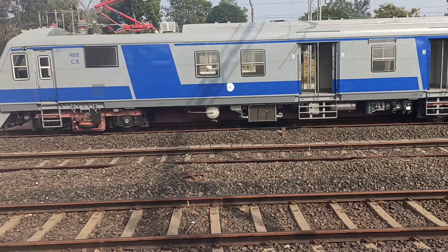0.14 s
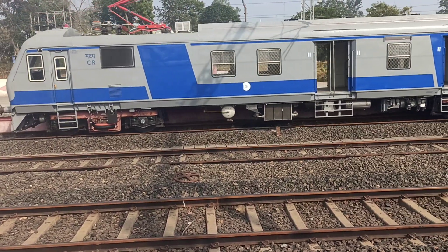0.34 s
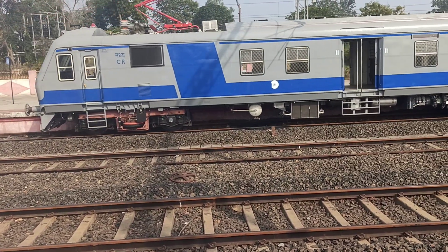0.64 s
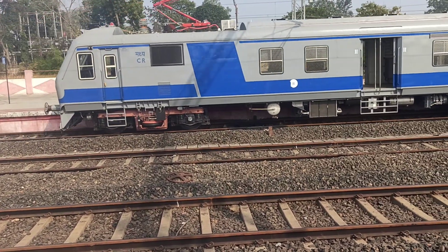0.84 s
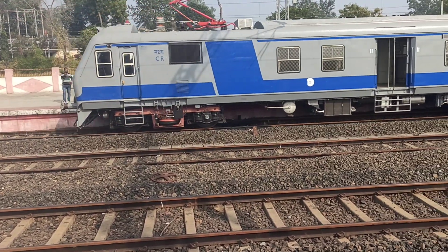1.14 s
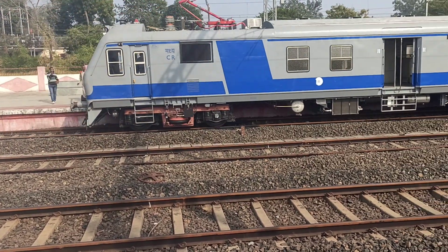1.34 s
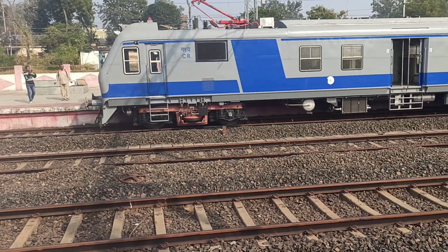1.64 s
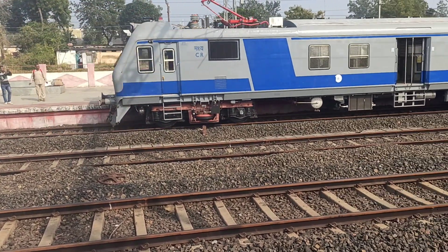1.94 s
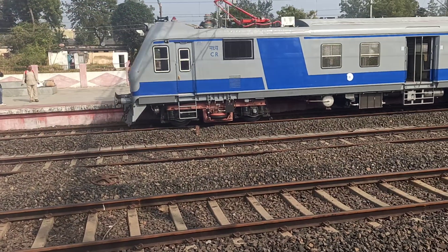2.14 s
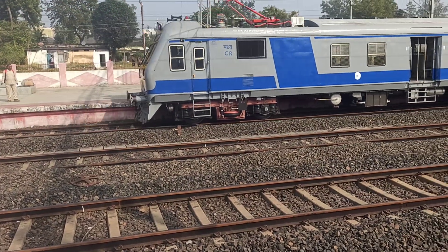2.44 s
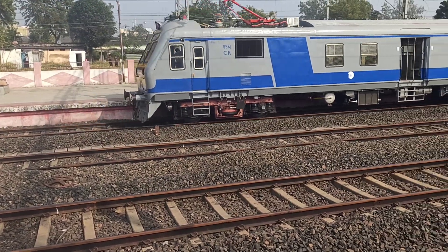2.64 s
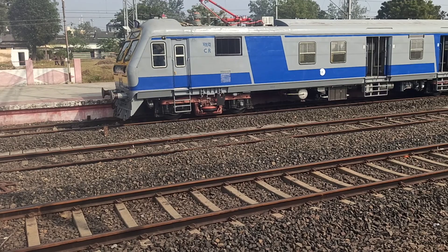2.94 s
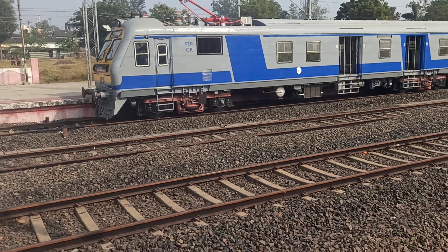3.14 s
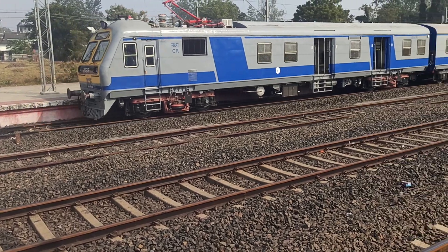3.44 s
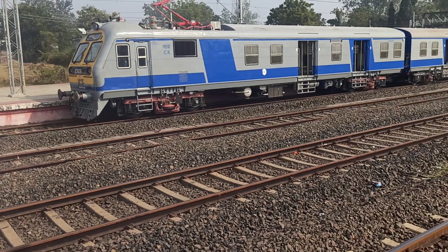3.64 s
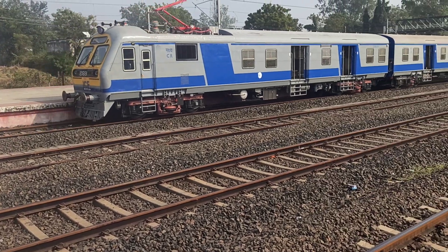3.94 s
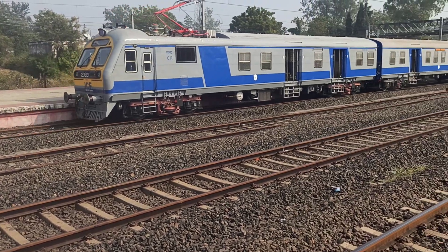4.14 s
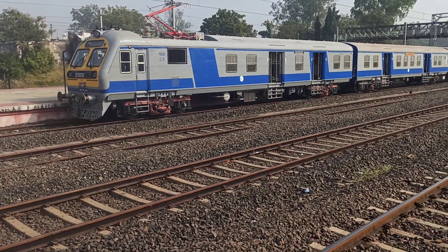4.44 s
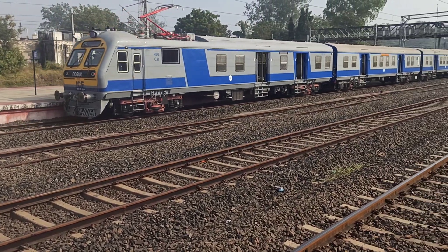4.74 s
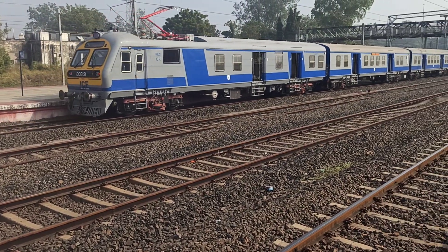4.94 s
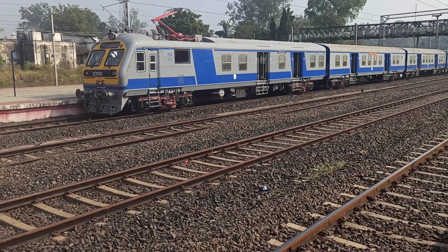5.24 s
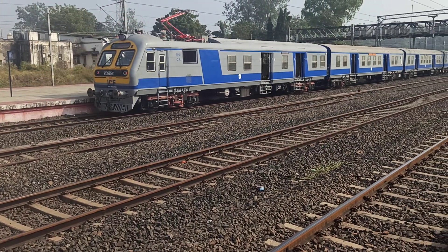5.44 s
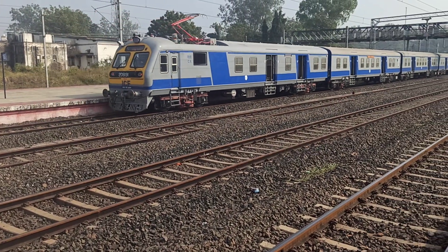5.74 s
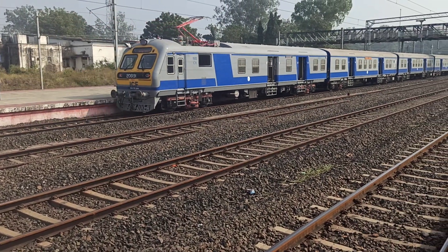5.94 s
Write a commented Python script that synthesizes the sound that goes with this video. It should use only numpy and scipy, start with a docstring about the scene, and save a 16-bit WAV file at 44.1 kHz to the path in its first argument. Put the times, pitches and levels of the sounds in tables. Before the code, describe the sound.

Wheels rumble and thud over rail joints as an electric train whines and hisses past; a brief horn toots, the compressor stops and air bursts out.

```python
"""A station platform, heard across the tracks by a phone with two ports, as an electric train draws away.
Cooling fans and a blower hiss in shaped noise, and a converter whines in two beating tones.
Wheels rumble in noise and thud over rail joints through bogie resonances; a compressor clatters in
harmonics of its shaft until it cuts out with a long blast of air, a jet of noise.
A horn off to one side toots once in swept harmonics, and its echoes are delayed, sharper repeats."""
import sys
import numpy as np
from scipy import signal
from scipy.fft import rfft, irfft, next_fast_len
from scipy.io import wavfile
from scipy.ndimage import uniform_filter1d, map_coordinates

SR = 44100
rng = np.random.default_rng(int(sys.argv[2]) if len(sys.argv) > 2 else 0)


def wav_record(signal):
    """Record a signal, one row per channel, as 16-bit PCM in the file named by sys.argv[1]."""
    frames = np.transpose(np.atleast_2d(signal))
    bounded = np.clip(frames, -1, 1)
    # unit amplitude maps onto the largest positive 16-bit level
    quanta = np.round(bounded * 32767).astype(np.int16)
    wavfile.write(sys.argv[1], SR, quanta)


def to_linear_factor(level_db):
    """Convert decibel levels (scalar or array-like) to linear amplitude factors."""
    exponent = np.asarray(level_db, float) / 20
    return 10 ** exponent


N = 268128
T = np.arange(N) / SR
SIZE = next_fast_len(N)
HZ = np.arange(SIZE // 2 + 1) * SR / SIZE + 1e-3  # just above zero, for the log axis
PORT_SIGN = np.array([[-1], [1]])  # left, right


def curves(table):
    """Columns of a table as sample-rate lines."""
    s, *columns = np.transpose(table)
    return [np.interp(T, s, c) for c in columns]


def across(table, hz):
    """Columns of a table read on a log-frequency axis."""
    f, *columns = np.transpose(table)
    return [np.interp(np.log(hz), np.log(f), c) for c in columns]


def unit(x):
    """Scale to rms 1."""
    return x / np.sqrt(np.mean(x ** 2))


def walk(rate):
    """Random levels held 1 / rate s and slewed twice; spread near 1."""
    hold = int(SR / rate)
    steps = np.repeat(rng.standard_normal(N // hold + 1), hold)
    return 1.318 * uniform_filter1d(uniform_filter1d(steps, hold), hold)[:N]


def ports(shared, own, table):
    """Two spectra: a shared part turned in phase, an unrelated part, and a tilt in level."""
    like, turn, pan_db = across(table, HZ)
    like = np.clip(like, 0, 1)
    common = np.sqrt(like) * shared * np.exp(.5j * PORT_SIGN * turn)
    return (common + np.sqrt(1 - like) * own) * to_linear_factor(-PORT_SIGN * pan_db / 2)


def hiss(colour, table, edges, swell, flicker_db, flicker_hz, rings=()):
    """Coloured noise in bands that swell together (dB in time) and flicker alone."""
    white = rfft(rng.standard_normal((3, SIZE)))
    db = across(colour, HZ)[0]
    for hz, width, lift_db in rings:
        db = db + lift_db / (1 + (2 * (HZ - hz) / width) ** 2)
    both = ports(white[0], white[1:], table) * to_linear_factor(db)
    out = 0
    for lo, hi in zip(edges, edges[1:]):
        band = irfft(both * (HZ >= lo) * (HZ < hi), SIZE)[:, :N]
        out = out + band * to_linear_factor(swell + flicker_db * walk(flicker_hz))
    return out


# Band edges in Hz: where the treble gap starts, where it ends, where the top ends.
TREBLE_GAP_HZ = (8680, 11560, 15780)


def jet(db, top_db, colour, rings, top_colour, table, swell_db, flicker_db):
    """Rushing air: a body reaching through the treble gap and a thin top above it, swelling together."""
    swell = swell_db * walk(16)
    low, high, top_hz = TREBLE_GAP_HZ
    body_edges = (1500, 3300, 4400, 5200, 6100, 7600, low, high)
    body = hiss(colour, table, body_edges, swell, flicker_db, 24.0, rings)
    top = hiss(top_colour, table, (high, 13000, top_hz), swell, flicker_db, 18.0)
    return to_linear_factor(db) * unit(body) + to_linear_factor(top_db) * unit(top)


# What the ports share of blower, fans and compressor.
# Each row: frequency in Hz, likeness 0-1, lead of the right in radians, left minus right in dB.
NEAR_PORTS = [(60, .988, 0, 0), (290, .975, 0, 0), (580, .5, -.6, -2), (730, .95, .12, -.2),
              (860, .9, .25, 1.5), (1150, .45, 2.0, 1.2), (1700, .3, 1.2, 3), (2200, .35, 2.3, -2.4),
              (2860, .8, 3.0, -7.8), (3500, .55, 2.5, -2), (4700, .65, 5.4, -2.3), (5500, .65, 5.7, -4.8),
              (6300, .5, 6.3, -2), (6900, .3, 7.4, -2), (7800, .55, 6.2, 1), (8300, .45, 6.0, 2.5),
              (12000, .35, 7.6, -4), (15000, .3, 6.3, 0)]
# The blower's one singing band. Each row: frequency in Hz, relative level in dB.
BLOWER_COLOUR = [(2600, -22), (2760, -1), (2890, 0), (3010, -2), (3200, -22)]
BLOWER_DB, BLOWER_SINKS_DB_S = -43.5, .1
UNLOAD_S = 3.52  # the compressor loses its load


def blower():
    """A narrow rush of air from the compressor's blower; it barely sinks, then fades as the load drops."""
    running = np.clip(1 - (T - UNLOAD_S) / .45, 0, 1)
    rush = unit(hiss(BLOWER_COLOUR, NEAR_PORTS, (2600, 2850, 3200), .8 * walk(12), 1.5, 30.))
    return running * rush * to_linear_factor(BLOWER_DB - BLOWER_SINKS_DB_S * T)


# Fan loudness. Each row: time in seconds, body level in dB, top level in dB.
FAN_LEVELS = [(0, -32.5, -48), (.45, -29.5, -42), (.8, -32.5, -48.5), (1.9, -32.5, -50.5),
              (2.45, -34.5, -52), (2.82, -34.5, -48.5), (3.2, -37.5, -56.5), (3.6, -37, -49),
              (6.08, -47.5, -55.5)]
# Colour of the fan body. Each row: frequency in Hz, relative level in dB.
FAN_COLOUR = [(1470, -50), (2500, -9.5), (2620, -36), (2760, 1), (2890, -8.5), (3360, -10), (4320, -8),
              (4580, -9), (4970, -16), (5400, -9.5), (5840, -17.5), (6180, -4.5), (6540, -2.5), (7480, -9),
              (8600, -18.5), (9000, -48.5), (11200, -51.5), (18900, -120)]
# Grille resonances. Each row: frequency in Hz, width in Hz, lift above the hiss in dB.
FAN_RINGS = [(4670, 110, 7.5), (5630, 180, 5.5), (6220, 63, 5), (6580, 55, 6), (7250, 120, 7)]
# Colour of the fan top. Each row: frequency in Hz, relative level in dB.
FAN_TOP = [(6820, -39), (11600, -2), (12100, 2), (12800, -6.5), (14800, -5.5), (15800, -21.5)]


def fans():
    """Cooling air through grilles, fading as the motor car draws away."""
    return jet(*curves(FAN_LEVELS), FAN_COLOUR, FAN_RINGS, FAN_TOP, NEAR_PORTS, 0.69, 1.45)


# Whine loudness. Each row: time in seconds, level of the pair in dB.
WHINE_DB = [(0, -37), (.3, -43), (.62, -34.5), (1.0, -40.5), (1.2, -49), (1.65, -39), (1.9, -40.5),
            (2.15, -38), (2.5, -43.5), (2.9, -38.5), (3.4, -37.5), (3.65, -46), (3.87, -38), (4.3, -44),
            (4.5, -35), (4.72, -37.5), (4.9, -55), (5.15, -40), (5.33, -48), (5.6, -35), (5.8, -49),
            (6.0, -39.5), (6.08, -46)]
# Faint converter companions. Each row: frequency in Hz, starting level in dB.
SIDE_TONES = [(1386, -54), (2190, -55.5), (2370, -58)]
# pitch at the start, its sag, and the spacing of the two units that beat together
WHINE_HZ, WHINE_SAG_HZ_S, PAIR_HZ = 1498, 2.3, 7.5


def whine():
    """Two converter tones a little apart that tremble and beat, with an octave and faint companions."""
    db, out = curves(WHINE_DB)[0], 0
    for apart in (-.5, .5):
        hz = WHINE_HZ - WHINE_SAG_HZ_S * T + apart * PAIR_HZ + 5.1 * walk(30)
        phase = 2 * np.pi * np.cumsum(hz) / SR
        port_phase = np.array([0.38 * walk(12), 0.76 * walk(12) - .3])
        out = out + to_linear_factor(db + 2.1 * walk(25.01)) / np.sqrt(2) * np.sin(phase + port_phase)
    # the octave rides on the upper tone
    out = out + to_linear_factor(-55.5 + 6.9 * walk(9)) * np.sin(2 * phase)
    for side_hz, side_db in SIDE_TONES:
        fading_db = side_db - 0.58 * T + 5.25 * walk(11)
        side_phase = 2 * np.pi * np.cumsum(side_hz + 6.62 * walk(30)) / SR
        out = out + to_linear_factor(fading_db) * np.sin(side_phase + np.array([[0], [1.2]]))
    return np.sqrt(2) * out  # sine peaks for rms levels


# What the ports share of wheels, joints and air blast.
# Each row: frequency in Hz, likeness 0-1, lead of the right in radians, left minus right in dB.
FAR_PORTS = [(60, .988, 0, 0), (290, .97, -.1, 0), (580, .67, -.5, 1.5), (730, .88, -.15, .7),
             (860, .9, -.2, 0), (1150, .45, -1.4, 3.6), (1490, .74, -.4, 0), (1720, .37, -1.8, -.6),
             (2200, .52, .1, -1.1), (2860, .8, .1, -1.5), (4300, .62, -.8, -2), (5500, .55, -.8, -4.4),
             (6300, .5, -1.8, -4.2), (6800, .4, -1.5, -2), (7300, .5, .9, 1.6), (7800, .5, .6, 2),
             (8300, .5, 3.6, 1.5), (12000, .3, 6.3, 1.5), (15000, .3, 3.9, -1)]
# Colour of wheel on rail. Each row: frequency in Hz, relative level in dB.
ROLL_COLOUR = [(30, -47), (50, -17.5), (70, -3.5), (117, -1.5), (200, -4), (290, 0), (400, -9.5),
               (490, -18.5), (620, -11), (760, -8), (920, -12.5), (1060, -23.5), (1500, -15), (1830, -26),
               (2600, -23)]
# start levels, both against the rms of the roar's noise, and how fast each sinks as the train draws away
ROAR_DB, ROAR_SINKS_DB_S = -30, 1.26
ROLL_MID_DB, MID_SINKS_DB_S = -30.5, 0.85


def rolling():
    """Wheel on rail: a lumpy low roar and a mid, ringing near the converter pitch, that sinks more slowly."""
    low = hiss(ROLL_COLOUR, FAR_PORTS, (20, 90, 140, 220, 470), 1.1 * walk(14), 2.4, 22.053)
    mid_ring = [(1493, 62, 7.1)]  # Hz, width Hz, lift dB
    mid = hiss(ROLL_COLOUR, FAR_PORTS, (480, 990, 1890, 3130), 0.27 * walk(4.92), 2.2, 10., mid_ring)
    roar = low * to_linear_factor(ROAR_DB - ROAR_SINKS_DB_S * T)
    thin = mid * to_linear_factor(ROLL_MID_DB - MID_SINKS_DB_S * T)
    return (roar + thin) / np.sqrt(np.mean(low ** 2))


# Wheels over rail joints. Each row: time in seconds, rattle drive in dB, decay to -60 dB in seconds
# (anything under 0.05 plays as 0.05).
JOINTS = [(0.187, -27, 0.7), (0.898, -24.5, 0.7), (1.105, -28, 0.5), (1.515, -28, 0.5), (2.466, -20, -0.63),
          (2.579, -31, 0), (2.858, -27, 0.7), (3.038, -35, 0.3), (3.547, -18.5, 0.5), (3.583, -26, 0.1),
          (3.831, -31, 0.5), (3.979, -23, 0.3), (4.235, -23, 0.5), (4.411, -34.5, 0.2),
          (4.655, -28.5, 0.76), (4.688, -33, 0.16), (4.903, -26, 0.35), (5.12, -26, 0.27),
          (5.591, -24, 0.42), (5.719, -37, 0.14)]
# Bogie modes, each used as two resonators in a row. Each row: frequency in Hz, width of one resonator
# in Hz, drive in dB. The last row is the bright rattle, whose drive is evened out.
BOGIE = [(117.5, 44, -2.5), (179, 49, -1.5), (286.6, 71, -1), (692, 390, -3)]
KNOCK_DB = 43  # knock impulse over rattle
# bright part at a -23.5 dB rattle, its growth per dB of rattle, and its rise along the scene
BRIGHT_DB, BRIGHT_SHARE, BRIGHTENS_DB_S = -35, .4, 1.2


def joints():
    """Each wheel drop knocks the bogie and shakes it with a dying rattle; the bright part builds more slowly."""
    shake, knock = np.zeros((2, N)), np.zeros(SIZE)
    for s, db, t60 in JOINTS:
        bright_db = BRIGHT_DB + BRIGHT_SHARE * (db + 23.5) - db + BRIGHTENS_DB_S * s
        age = np.clip(T - s + 0.009, 0, None)  # the rattle starts 9 ms before the knock
        dying = to_linear_factor(db) * np.exp(-np.log(1000) * age / max(t60, .05))
        dull_rise = 1 - np.exp(-age / 0.006)
        bright_rise = to_linear_factor(bright_db) * (1 - np.exp(-age / 0.03))
        shake += dying * np.array([dull_rise, bright_rise])
        knock[int(s * SR)] = to_linear_factor(db + KNOCK_DB)
    white = rfft(rng.standard_normal((3, SIZE)))
    rings = [to_linear_factor(db) / (1 + 1j * (hz / width) * (HZ / hz - hz / HZ)) ** 2 for hz, width, db in BOGIE]
    dull_ring = sum(rings[:-1])
    out = irfft(rfft(knock) * dull_ring, SIZE)[:N]
    for ring, size in zip((dull_ring, rings[-1]), shake):
        rattle = irfft(ports(white[0], white[1:], FAR_PORTS) * ring, SIZE)[:, :N]
        # many loose parts at once: the rattle keeps an even strength
        out = out + size * rattle / np.sqrt(uniform_filter1d(np.mean(rattle ** 2, axis=0), size=1500))
    return out


# Shaft speed. Each row: time in seconds, turns per second.
SHAFT = [(0, 24.49), (2, 24.44), (3.5, 24.36), (3.95, 24.3)]
# Strong low orders of the clatter. Each row: order of the shaft, relative level in dB.
PUMP_LOW = [(22, -22), (23, -22), (24, -25.5), (25, -15.5), (26, -24.5), (27, -20.5), (28, -13),
            (29, -10.5), (30, -5.5), (31, -27), (32, -12.5), (33, -5.5), (34, -26.5), (35, -13.5),
            (36, -11), (37, -12.5), (38, -19), (39, -18.5), (40, -17.5), (41, -19.5), (42, -25),
            (43, -26.5), (44, -18), (45, -47)]
# Casing colour of the higher orders. Each row: frequency in Hz, relative level in dB.
PUMP_CASE = [(1000, -13), (1250, -32), (1490, -23.5), (1700, -25.5), (1950, -42), (2190, -22.5),
             (2500, -55.5), (2800, -13), (2980, -15.5), (3200, -43)]
# Drone on the tenth order of the shaft. Each row: time in seconds, level in dB.
DRONE = [(0, -25.5), (.15, -33.5), (.28, -27.5), (.75, -35), (.9, -33), (1.4, -42), (1.53, -33),
         (1.62, -37), (3.45, -40.5)]
PUMP_DB, PUMP_SINKS_DB_S, PUMP_STOPS_S, RUN_DOWN_S = -29.8, 0.9, 3.9, 0.13
UNLOAD_WAVER = .012  # the shaft speed wavers by this share once the load drops


def compressor():
    """The same clatter comes round every shaft turn, changing a little from moment to moment."""
    turns, db = curves(SHAFT)[0], PUMP_DB - PUMP_SINKS_DB_S * T
    unloaded = np.clip((T - UNLOAD_S) / .1, 0, 1)
    angle = np.cumsum(turns * (1 + UNLOAD_WAVER * walk(9) * unloaded)) / SR
    order = np.arange(1, 135)
    chance = rng.standard_normal((len(order), 2))
    order_db = across(PUMP_CASE, order * turns[0])[0] + 2.75 * chance[:, 0]
    order_db[:int(PUMP_LOW[0][0])] = -60  # next to nothing below the listed orders
    for k, low_db in PUMP_LOW:
        order_db[int(k) - 1] = low_db
    like, turn, pan_db = across(NEAR_PORTS, order * turns[0])
    unlike = np.sqrt(1 - np.clip(like, 0, 1))
    steps = 44  # wave shapes over the first 4 s
    drift = rng.standard_normal((3, steps, len(order), 2)) @ [1, 1j]
    common_drift = np.minimum(0.19 + order / 300, .7) * drift[0]
    out = []
    # the left port takes the larger part of the turn and tilt
    for sign, own in ((-1.38, drift[1]), (0.73, drift[2])):
        lines = to_linear_factor(order_db - sign * pan_db / 2) * np.exp(1j * (9 * chance[:, 1] + sign * turn / 2))
        lines = lines * (1 + common_drift + 0.76 * unlike * own)
        shapes = irfft(np.pad(lines, ((0, 0), (1, 0))), 4096)  # one shaft turn per row
        place = [np.minimum(T / 4, 1) * (steps - 1), angle % 1 * 4095]
        out.append(map_coordinates(shapes, place, order=1))
    clatter = unit(np.array(out)) * to_linear_factor(db + 1.36 * walk(10))
    # it runs down just after the valve opens
    running = np.clip((PUMP_STOPS_S - T) / RUN_DOWN_S, 0, 1)
    drone = np.sqrt(2) * to_linear_factor(curves(DRONE)[0] + 2.5 * walk(8)) * np.sin(2 * np.pi * 10 * angle)
    return running * clatter + drone * np.clip((3.5 - T) / 0.075, 0, 1)


# Colour of the jet's body. Each row: frequency in Hz, relative level in dB.
AIR_COLOUR = [(1120, -42), (1900, -17.5), (2100, -12), (2610, -15), (2860, -4.5), (3170, -12), (3830, -5),
              (4210, -3.5), (4810, -2.5), (5000, -14.5), (5420, -4), (6190, 1), (6810, -5.5), (7390, -5),
              (8600, -3.5), (9000, -29.5), (11200, -36.5), (18900, -120)]
# Pipe resonances. Each row: frequency in Hz, width in Hz, lift above the jet in dB.
AIR_RINGS = [(4220, 97, 7), (4680, 63, 5), (5470, 110, 4.5), (6200, 120, 7.5), (6600, 100, 3),
             (7450, 74, 9)]
# Colour of the jet's top. Each row: frequency in Hz, relative level in dB.
AIR_TOP = [(6820, -47), (11600, -6.5), (13400, -5), (15100, -2), (15800, -19)]
# Surges as the valve opens. Each row: time in seconds, lift above the jet in dB, lift of the top in dB,
# half length in seconds.
SURGES = [(3.675, -0.5, 8.5, .04), (3.77, 4, 9.5, 0.025)]
VALVE_S, VALVE_RISE_S, JET_DB, JET_TOP_DB, JET_SINKS_DB_S = 3.6, 0.043, -28.5, -44, 1.16
SETTLE_DB, SETTLE_S = 2, 0.55  # the jet starts strong and settles


def air_blast():
    """The unloader valve opens and a jet of air hisses away, surging and sharpest at first."""
    age = np.clip(T - VALVE_S, 0, None)
    sinking_db = SETTLE_DB * np.exp(-age / SETTLE_S) - JET_SINKS_DB_S * age
    db, top_db = JET_DB + sinking_db, JET_TOP_DB + sinking_db
    for s, lift_db, top_lift_db, half_s in SURGES:
        surge = np.exp(-((T - s) / half_s) ** 2)
        db, top_db = db + lift_db * surge, top_db + top_lift_db * surge
    opening = np.clip(age / VALVE_RISE_S, 0, 1)
    return opening * jet(db, top_db, AIR_COLOUR, AIR_RINGS, AIR_TOP, FAR_PORTS, 0.32, 1.6)


HORN_S, HORN_HOLD_S, HORN_ATTACK_S, HORN_RELEASE_S, HORN_FADE_DB_S = 1.695, .262, .075, .035, 14
# pitch: starts sharp, sags to its rest, then creeps up
HORN_HZ, HORN_SHARP_HZ, HORN_SAG_S, HORN_CREEP_HZ_S = 283.2, 22, .032, 10
ECHO_STRETCH = .08  # an echo lasts longer by this share of its delay


def toot(delay_s, sharper_hz):
    """Loudness and phase of the reed as heard along one path."""
    age = np.clip(T - HORN_S - delay_s, 0, None)
    attack = np.clip(age / HORN_ATTACK_S, 0, 1)
    release = np.clip(1 - (age - HORN_HOLD_S - ECHO_STRETCH * delay_s) / HORN_RELEASE_S, 0, 1)
    hz = HORN_HZ + sharper_hz + HORN_SHARP_HZ * np.exp(-age / HORN_SAG_S) + HORN_CREEP_HZ_S * age
    return attack * release * to_linear_factor(-HORN_FADE_DB_S * age), 2 * np.pi * np.cumsum(hz) / SR


# Horn partials 1, 2, .. at the ports. Each row: lead of the right in radians, left minus right in dB.
HORN_PARTIALS = [(.5, -1), (2.2, -3.5), (2.0, -.9), (-2.8, 2.5), (-2.4, 0), (-.8, 0), (.6, 0), (1.2, -2),
                 (.5, -2), (2.5, -6), (2.0, 0), (2.0, 0), (2.4, 0), (2.0, 0)]
# Strength of partials 1, 2, .. in dB, before the lift given to the first three.
HORN_DB = [-19, -31.5, -27, -30, -34, -33.5, -44, -41.5, -41, -42, -40, -44, -43, -46]
# Echoes. Each row: delay in seconds, sharper by Hz, level in dB of partials 1, 2, 3 and of the rest,
# phase blur in radians (partial 1 stays unblurred).
HORN_ECHOES = [(.085, 3.4, -20, -1, -2, -11, .07), (.305, 7, -8, -12, -14, -13, .45),
               (.72, 7.5, -19, -24, -26, -28, .45)]
# Moments in seconds when the first echo opposes partials 1, 2, 3; the rest use the third moment.
HORN_NULL_S = [1.99, 1.86, 1.91]


def horn():
    """A reed horn far to one side; the first echo beats with each partial, later ones are duller and blurred."""
    direct = toot(0, 0)
    paths = [(direct, (0, 0, 0, 0), 0)]
    paths += [(toot(s, hz), db, blur) for s, hz, *db, blur in HORN_ECHOES]
    apart = direct[1] - paths[1][0][1]
    out = 0
    for k, ((turn, pan_db), db) in enumerate(zip(HORN_PARTIALS, HORN_DB)):
        level = to_linear_factor(db - PORT_SIGN * pan_db / 2 + (k > 2) * 2.6 * walk(29.9))
        if k < 3:
            # partials that reach the ports out of step are louder at each port than in their sum
            level = level / max(np.cos(turn / 2), .3)
        null = (k + 1) * apart[int(HORN_NULL_S[min(k, 2)] * SR)] + np.pi
        for j, ((size, phase), path_db, blur) in enumerate(paths):
            wobble = blur * np.array([walk(15), walk(15)]) * (k > 0) if j else 0
            # later echoes flicker in level, save for the first partial
            path_gain = to_linear_factor(path_db[min(k, 3)] + (j > 1) * (k > 0) * 4.5 * walk(14.02))
            partial_phase = (k + 1) * phase + k * k * .7 + PORT_SIGN * turn / 2
            out = out + level * size * path_gain * np.sin(partial_phase + (j == 1) * null + wobble)
    return np.sqrt(2) * out  # sine peaks for rms levels


def scene():
    """Everything on the tracks, summed at the two ports."""
    return blower() + fans() + whine() + rolling() + joints() + compressor() + air_blast() + horn()


def low_pass(x):
    """Removes everything above the highest recorded frequency."""
    return signal.sosfilt(signal.butter(12, 16040, fs=SR, output="sos"), x)


def record(dry):
    """The finished mix, as the phone keeps it."""
    return low_pass(dry)


dry = scene()
out = record(dry)
wav_record(out)
```